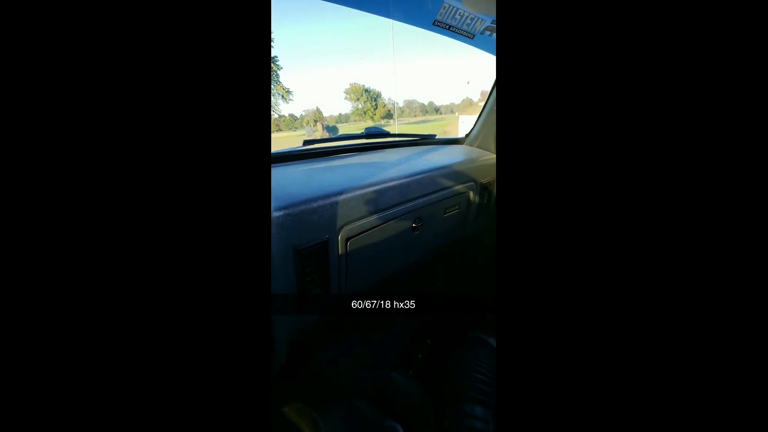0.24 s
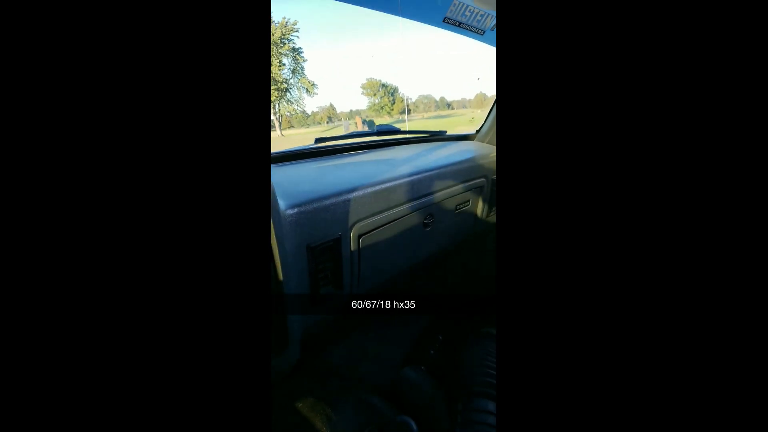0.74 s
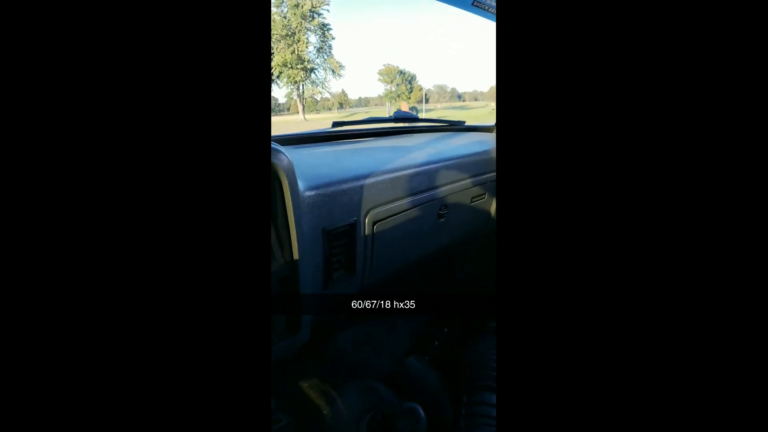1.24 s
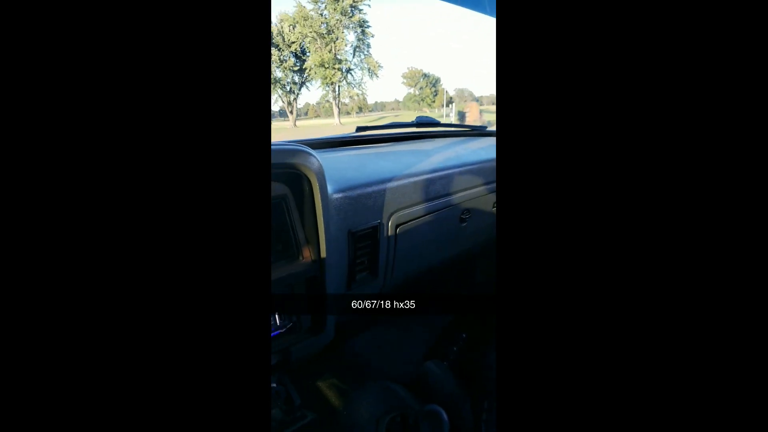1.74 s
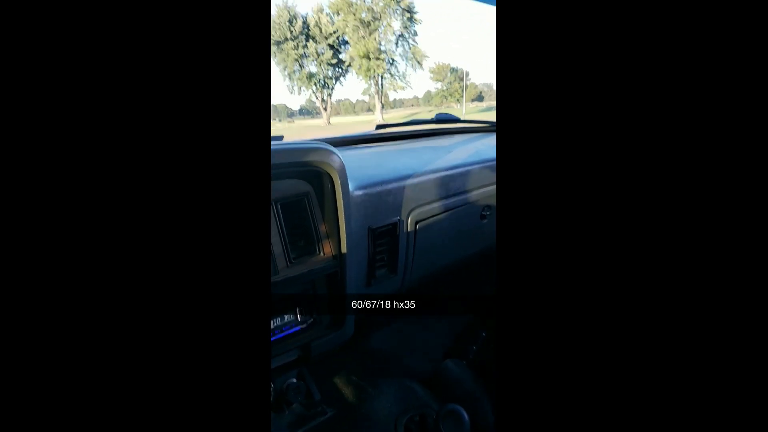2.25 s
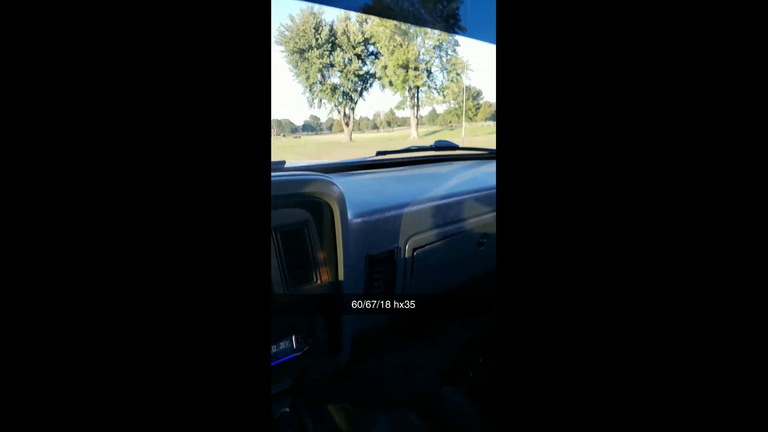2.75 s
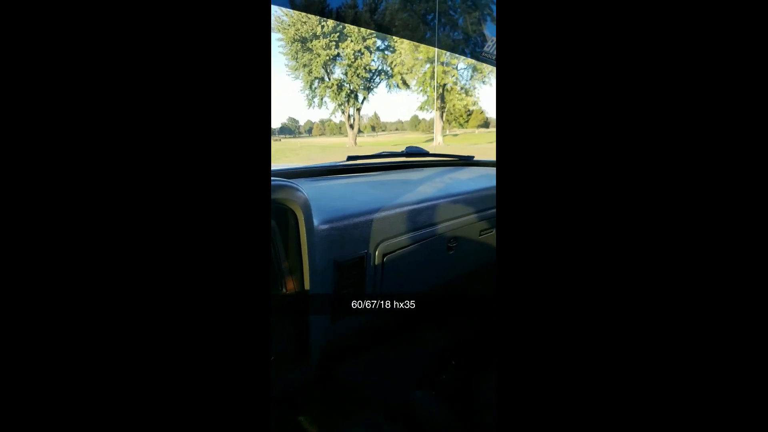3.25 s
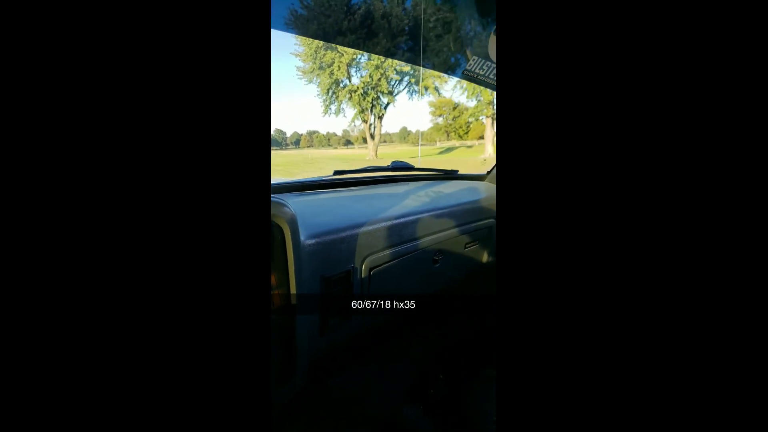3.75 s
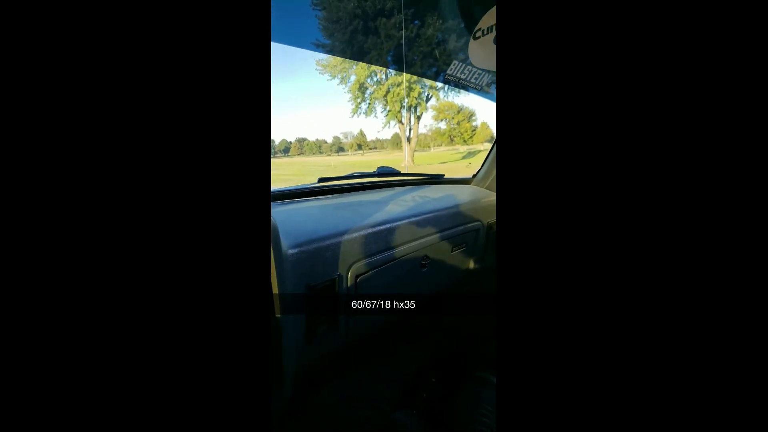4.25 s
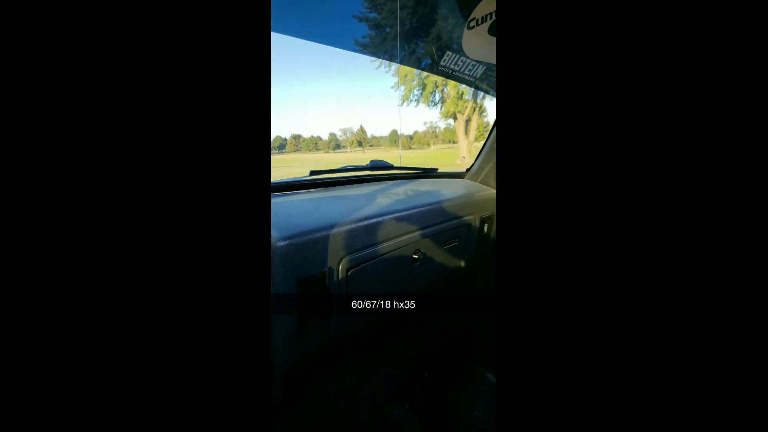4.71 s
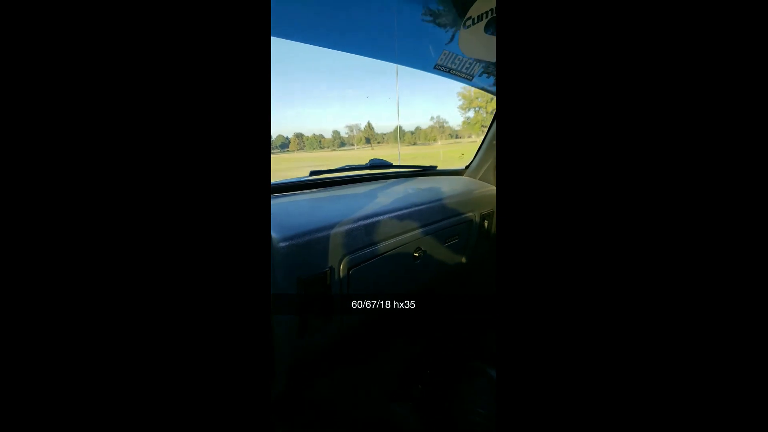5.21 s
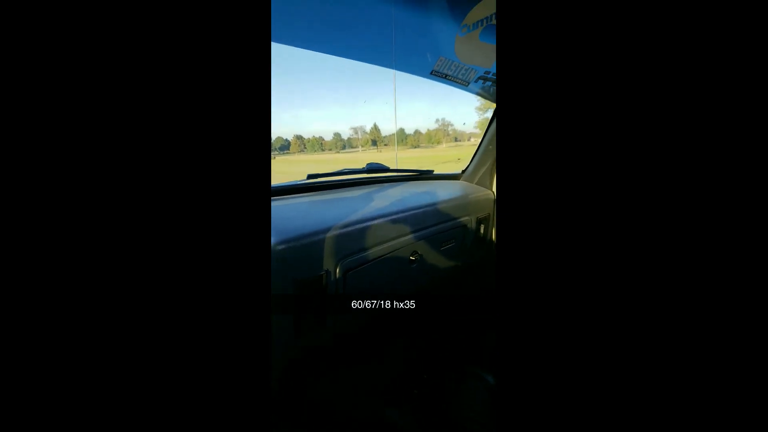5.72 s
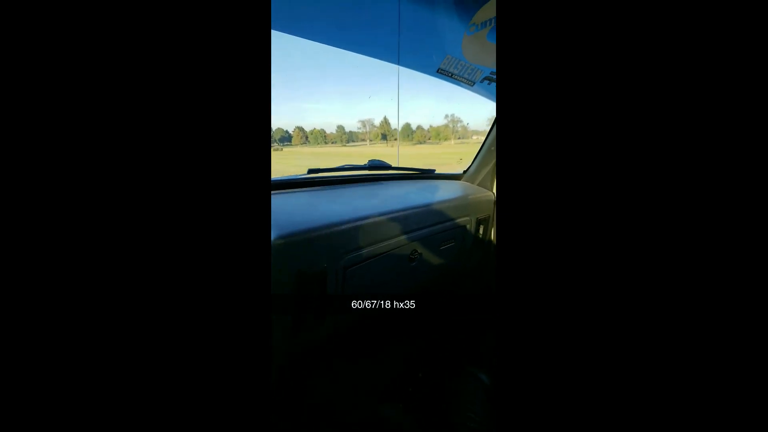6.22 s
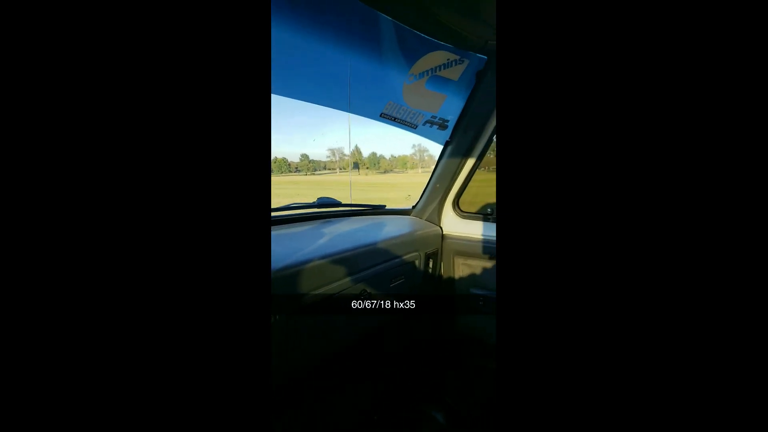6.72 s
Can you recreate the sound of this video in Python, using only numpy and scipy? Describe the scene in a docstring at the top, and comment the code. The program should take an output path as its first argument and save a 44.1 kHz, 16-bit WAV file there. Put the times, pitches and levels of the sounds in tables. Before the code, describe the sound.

Inside a pickup cab, a diesel engine pulls hard through one upshift, clattering and booming, while a turbo whistle climbs and airy hiss builds.

```python
"""Diesel pickup pulling away, heard in the cab

A six-cylinder turbo diesel accelerates under load, with one upshift halfway. The exhaust is a tone at the
firing rate plus its octave; shake and growl are sines at half-orders of the crank. Knock is a repeating
clatter plus noise in a burst per firing. The turbo is a rising whistle with narrow bands of noise around
it; its intake hiss and the road rumble are shaped noise, growing with boost and with time."""
import sys
import numpy as np
from scipy import signal
from scipy.fft import rfft, irfft, next_fast_len
from scipy.io import wavfile
from scipy.ndimage import map_coordinates

SR = 44100
rng = np.random.default_rng(int(sys.argv[2]) if len(sys.argv) > 2 else 0)


def bounce(signal):
    """Save signal as a 16-bit WAV file at the path given by the first command-line argument."""
    frames = np.transpose(np.atleast_2d(signal))
    limited = np.clip(frames, -1, 1)
    pcm = np.round(limited * 32767).astype(np.int16)
    wavfile.write(sys.argv[1], SR, pcm)


N = 307377
TIME = np.arange(N) / SR  # s
FIRINGS_PER_TURN = 3  # six cylinders, four-stroke

# panel and cavity resonances of the cab: [f/Hz, width/Hz, lift/dB]
PANELS = [(114.7, 13, 11.5), (243, 20, 6.5), (279.7, 14, 6.5), (307.6, 14, 8.5), (348, 6.7, 5.5),
          (387, 7.3, 2), (431, 9.2, 4.5), (474.3, 24, 8), (505, 12, 5), (574, 6.6, 5), (631.6, 36, 5.5),
          (766, 14, 6.5), (949, 41, 5), (1130, 50, 2.5), (1271, 96, 8), (1570, 40, 4.5), (2160, 150, 4),
          (3110, 25, 3.5)]


def undb(db):
    """Level to amplitude: a factor of ten for every 20 dB."""
    return 10 ** (np.asarray(db) / 20)


def unit(x):
    """Normalisation to an rms value of 1."""
    return x / np.sqrt(np.mean(x ** 2))


def noise():
    """White noise: equal power at all frequencies."""
    return rng.standard_normal(N)


def walk(rate):
    """Band-limited fluctuation: random values, `rate` per second, joined by cosine easing; rms 1."""
    step = TIME * rate + rng.random()
    values = noise()
    i = step.astype(int)
    ease = .5 - .5 * np.cos(np.pi * (step % 1))
    return unit(values[i] * (1 - ease) + values[i + 1] * ease)


def tone(cycles):
    """Phase-driven oscillator: a sine of rms 1 along a running phase in cycles."""
    return np.sqrt(2) * np.sin(2 * np.pi * (cycles + rng.random()))


def resonance_db(hz, resonances):
    """Resonance: bell-shaped changes of level around centre frequencies, summed in dB."""
    return sum(db / (1 + (2 * (hz - centre) / width) ** 2) for centre, width, db in resonances)


def colour(x, spectrum, resonances=()):
    """Linear filtering by a spectrum, resonances and the random ripple of dense cab modes; rms 1."""
    ripple_spacing_hz, ripple_depth_db, ripple_from_hz = 35, 1.9, 1500
    size = next_fast_len(N + SR // 2)
    hz = np.maximum(np.arange(size // 2 + 1) * SR / size, 1)
    points, levels = np.transpose(spectrum)
    db = np.interp(np.log(hz), np.log(points), levels) + resonance_db(hz, resonances)
    modes = np.arange(ripple_from_hz, SR / 2, ripple_spacing_hz)
    ripple_db = np.interp(hz, modes, ripple_depth_db * rng.standard_normal(len(modes)), left=0)
    return unit(irfft(rfft(x, size) * undb(db + ripple_db), size)[:N])


def gearbox():
    """Gear ratio: firing rate in Hz, lowered by the upshift, and the share 0-1 of the higher gear."""
    start_hz, rise_hz_per_s = 66.05, 5.22
    shift_at_s, shift_s, shift_drop_hz = 3.54, .44, 9.47
    gear = .5 - .5 * np.cos(np.pi * np.clip((TIME - shift_at_s) / shift_s, 0, 1))
    # at first the revs are still catching up with the throttle
    lag_hz, lag_s = 1.7, .2
    climb = start_hz + rise_hz_per_s * TIME - lag_hz * np.exp(-TIME / lag_s)
    return climb - shift_drop_hz * gear, gear


def under_load(law, boost, gear):
    """Load dependence: level in dB rises in proportion to boost and steps up in the higher gear."""
    base_db, boost_db, gear_db = law
    return base_db + boost_db * boost + gear_db * gear


def boom_level(firing_hz, gear):
    """Cabin boom: level in dB of the firing fundamental, higher when the engine lugs in the higher gear."""
    # response of the cab to the exhaust fundamental: [f/Hz, level/dB]
    boom_response = [(64, -14), (71, -15), (76, -17), (78.5, -20.5), (82, -19.5), (85, -22), (90, -22.2),
                     (93, -24)]
    lug_db = 3.5
    return np.interp(firing_hz, *np.transpose(boom_response)) + lug_db * gear


def exhaust(firings, firing_hz, boom_db, gear):
    """Periodic pulsation: the muffler leaves the booming fundamental and a weak second harmonic."""
    # standing waves of the cab that the second harmonic crosses: [f/Hz, width/Hz, lift/dB]
    cab_air = [(128.8, 5.4, 14.5), (142.5, 5.4, 9.5), (153.7, 6, 3.5), (168.8, 4.1, 7), (177.4, 3.9, 6.5)]
    between_db, lug_db = -48.5, 3  # second harmonic off resonance, and its gain in the higher gear
    second_db = between_db + resonance_db(2 * firing_hz, cab_air) + lug_db * gear
    boom = unit(np.sin(2 * np.pi * firings)) * undb(boom_db + 0.2 * walk(29))
    return boom + tone(2 * firings) * undb(second_db)


def crank_orders(orders, turns, firing_hz, load_db, follow):
    """Order excitation: sines at multiples of crank speed, each swelling as it crosses a resonance."""
    slip_cycles = 0.045  # rms phase wander
    grid = np.arange(1024)  # Hz
    cab_db = resonance_db(grid, PANELS)
    out = 0
    for multiple, db in orders:
        lift_db = np.interp(multiple * firing_hz / FIRINGS_PER_TURN, grid, cab_db)
        waver_db = 2.6 * walk(4) + 1.2 * walk(13)
        out = out + tone(multiple * turns + slip_cycles * walk(12)) * undb(db + lift_db + waver_db)
    return out * undb(follow * (load_db - load_db.mean()))


def shake(turns, firing_hz, knock_db):
    """Forced vibration: unequal cylinders shake the cab at multiples of half the crank speed."""
    # engine shake before resonance and load: [cycles per crank turn, level/dB]
    shake_orders = [(1.5, -44), (2, -41.5), (2.5, -52.5), (3.5, -58), (4, -59), (4.5, -53), (5, -55),
                    (6.5, -62), (7, -63.5), (7.5, -61), (8, -63.5), (9, -57), (9.5, -70.5), (10, -65),
                    (10.5, -68), (12, -63), (13, -71.5)]
    return crank_orders(shake_orders, turns, firing_hz, knock_db, follow=0.46)


def growl(turns, firing_hz, boost, gear):
    """Forced vibration at high crank orders, following the load in full."""
    # growl before resonance and load: [cycles per crank turn, level/dB]
    growl_orders = [(14, -65.5), (15, -62.5), (16, -64), (16.5, -66), (17, -63.5), (18, -61.5), (19, -65.5),
                    (19.5, -69), (20, -68), (21, -67.5), (22, -64.5), (23, -67), (27, -69)]
    # load law; only its variation counts: [lowest boost/dB, added at full boost/dB, added in higher gear/dB]
    growl_law = (-52.5, 7.5, 2)
    return crank_orders(growl_orders, turns, firing_hz, under_load(growl_law, boost, gear), follow=1)


def repeating(cycles, size, count=3):
    """Periodicity: a rattle pattern played once per cycle, slowly blending between random shapes."""
    shapes = irfft(np.exp(2j * np.pi * rng.random((count, size // 2 + 1))))
    weights = np.array([walk(2) for _ in shapes])
    position = [cycles % 1 * size]
    played = [map_coordinates(shape, position, order=3, mode="grid-wrap") for shape in shapes]
    blend = np.sum(weights * played, axis=0)
    return unit(blend / np.sqrt(.1 + np.sum(weights ** 2, axis=0)))


def knock(firings, turns, knock_db):
    """Impulsive excitation: each firing jolts the block, partly repeating with the crank, partly new."""
    # transmission through the firewall, relative: [f/Hz, level per Hz/dB]
    firewall = [(90, -7.5), (130, 2), (200, 0.5), (260, 0), (350, -3.5), (480, -6), (700, -4), (830, -8),
                (1000, -7.5), (1500, -11.5), (2200, -17), (2800, -17.5), (3500, -26), (5000, -25.5),
                (8000, -51), (16000, -74.5)]
    pattern = repeating(turns / 2, size=1024) + repeating(turns, size=512)
    mid_band = signal.butter(2, [680, 4000], "bandpass", fs=SR, output="sos")
    pattern = signal.sosfilt(mid_band, pattern)
    # a burst dies away after every injection, each of a slightly different strength
    scatter_db = 1.9
    strength = undb(scatter_db * noise()[firings.astype(int)])
    burst = 1 + strength * np.exp(-(firings % 1) / .7)  # decay in firing intervals
    # the loose part swells and sinks a little with uneven combustion
    loose = noise() * undb(.8 * walk(14))
    clatter = (.75 * pattern + loose) * burst
    return colour(clatter, firewall, PANELS) * undb(knock_db - 1.6)


def turbo(hz, gear):
    """Rotating-blade tone: the compressor sings inside a narrow halo and a wider turbulent whoosh."""
    # duct resonances and dips that the whistle glides through: [f/Hz, width/Hz, change/dB]
    duct = [(3540, 160, 4.5), (3850, 90, -9), (4000, 64, 8), (4130, 83, 6), (4700, 260, 5.5),
            (5360, 950, 12), (5810, 150, 5.5), (6230, 130, 7), (6650, 340, -0.5), (7070, 330, 12),
            (7550, 430, 11.5), (7840, 120, 9)]
    between_db, shift_dip_db = -76, -4.5  # off resonance; the whistle sinks while the gears change
    whistle_db = between_db + resonance_db(hz, duct) + shift_dip_db * np.sin(np.pi * gear)
    cycles = np.cumsum(hz + 8 * walk(70)) / SR
    # random flutter, as of a gliding tone among the standing waves of the cab
    flutter = unit(1 + .5 * walk(32))
    whistle = tone(cycles) * flutter * undb(whistle_db)
    # amplitude modulation by noise spreads the tone into a band
    halo = tone(cycles) * walk(300) * undb(-74)
    whoosh = tone(cycles) * walk(1400) * undb(-69)
    follow = 0.4  # share of the whistle's swing in dB
    return whistle + (halo + whoosh) * undb(follow * (whistle_db - whistle_db.mean()))


def intake(boost, gear):
    """Turbulent flow noise: air rushes through filter and pipes, louder and brighter with boost."""
    # intake air, relative: [f/Hz, level per Hz/dB]
    air_spectrum = [(1000, -16), (3000, -2.5), (4500, 8), (5300, 8.5), (6300, 3.5), (7500, -1.5),
                    (8300, -9), (9200, -9.5), (10500, -7), (12000, -0.5), (13700, -7.5), (15500, -10.5)]
    # intake pipe resonances: [f/Hz, width/Hz, lift/dB]
    pipe = [(5206, 60, 4), (5313, 50, 3.5), (5799, 40, 3.5)]
    # load law, before the offsets below: [lowest boost/dB, added at full boost/dB, added in higher gear/dB]
    hiss_law = (-78.5, 18.3, 2)
    hiss_db = under_load(hiss_law, boost, gear)
    air = colour(noise(), air_spectrum, pipe) * undb(.5 * walk(40))
    low = signal.sosfiltfilt(signal.butter(2, 7000, fs=SR, output="sos"), air)
    # the lower part grows less than the rest, which brightens the hiss
    brighten = 0.42
    boost_db = hiss_db - hiss_db.mean()
    rush = (low * undb(-brighten * boost_db) + air - low) * undb(hiss_db + 7)
    # the finest turbulence grows fastest, towards full boost
    top_band = signal.butter(2, [14600, 16500], "bandpass", fs=SR, output="sos")
    sizzle = unit(signal.sosfilt(top_band, noise()))
    sizzle_db = hiss_db.max() - 3 + 1.5 * (hiss_db - hiss_db.max())
    return rush + sizzle * undb(sizzle_db)


def road():
    """Random excitation: tyres on an uneven surface shake the body, more as the truck gathers speed."""
    # rumble in the body, relative: [f/Hz, level per Hz/dB]
    rumble = [(10, -19.5), (22, -12.5), (32, 3.5), (45, 4), (58, 1.5), (80, -5), (120, -6), (160, -11),
              (200, -23), (400, -27.5), (1000, -50.5), (4000, -92)]
    # rough patches in the road: [t/s, length/s, swell/dB]
    rough = [(1.1, 0.2, 8), (3.054, 0.71, 3.5), (3.85, .15, 0), (6.93, 0.39, 5)]
    start_db, growth_db_per_s = -45, 2
    patches_db = sum(db * np.exp(-(2 * (TIME - s) / length) ** 2) for s, length, db in rough)
    bumps_db = 1.2 * walk(9)
    return colour(noise(), rumble) * undb(start_db + growth_db_per_s * TIME + patches_db + bumps_db)


def scene():
    """Superposition at the driver's seat: revs, gear and boost drive the engine and turbo layers."""
    # turbo speed: [t/s, whistle f/Hz]
    turbo_speed = [(0.0, 3340), (0.5, 3690), (2.0, 4450), (3.0, 5190), (3.6, 5565), (4.15, 5665),
                   (4.5, 5870), (5.7, 6920), (6.5, 7550), (6.97, 7870)]
    # knock load law, before a fixed offset: [lowest boost/dB, added at full boost/dB, added in higher gear/dB]
    knock_law = (-47, 6.3, 0.87)
    firing_hz, gear = gearbox()
    turbo_hz = np.interp(TIME, *np.transpose(turbo_speed))
    boost = (turbo_hz - turbo_hz.min()) / np.ptp(turbo_hz)  # 0-1
    firings = np.cumsum(firing_hz) / SR
    turns = firings / FIRINGS_PER_TURN
    boom_db = boom_level(firing_hz, gear)
    knock_db = under_load(knock_law, boost, gear)
    # shake and growl follow a share of the boom's swing in dB
    boom_share = .45
    strain = undb(boom_share * (boom_db - boom_db.mean()))
    vibration = shake(turns, firing_hz, knock_db) + growl(turns, firing_hz, boost, gear)
    engine = exhaust(firings, firing_hz, boom_db, gear) + strain * vibration
    engine = engine + knock(firings, turns, knock_db)
    return (engine + turbo(turbo_hz, gear) + intake(boost, gear) + road())[None]


def record(dry):
    """Band limitation: a steep elliptic low-pass cuts the top."""
    top_hz = 15720
    return signal.sosfilt(signal.ellip(14, .1, 80, top_hz, fs=SR, output="sos"), dry)


dry = scene()
out = record(dry)
bounce(out)
```